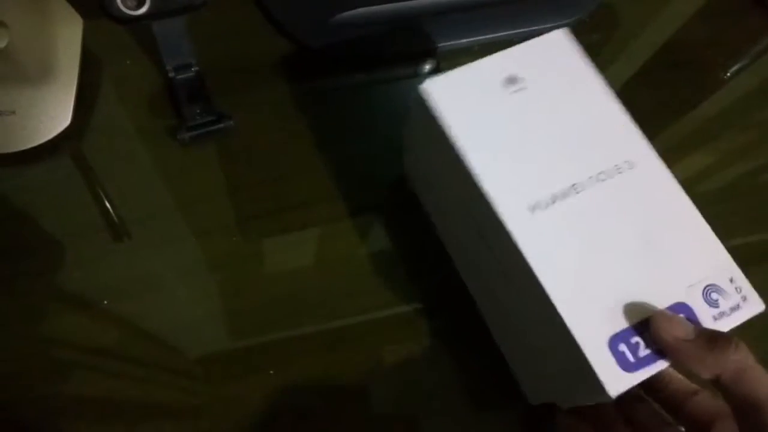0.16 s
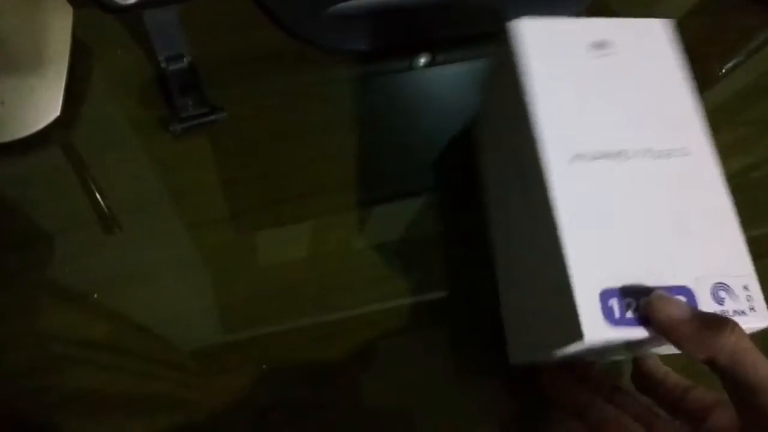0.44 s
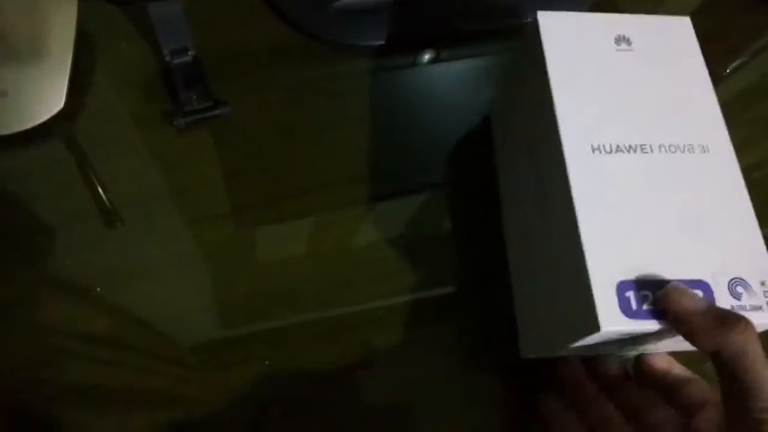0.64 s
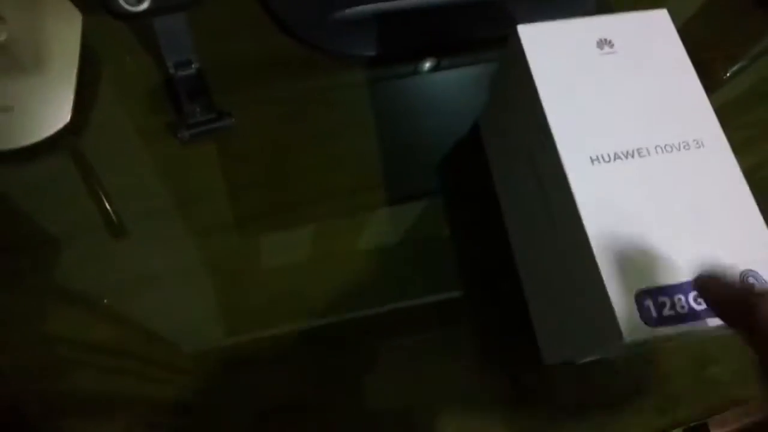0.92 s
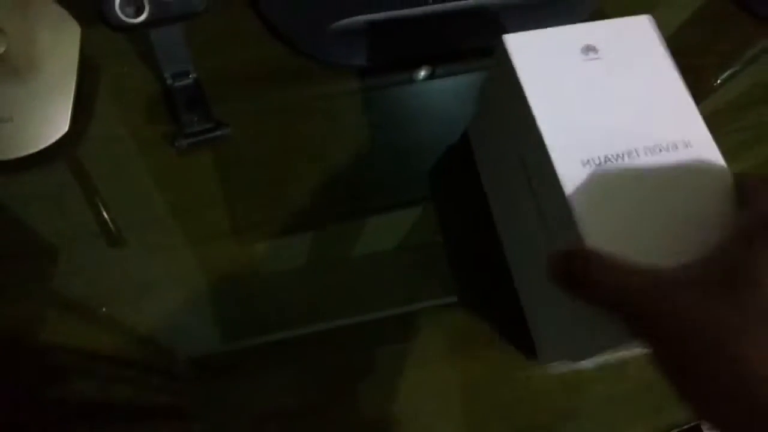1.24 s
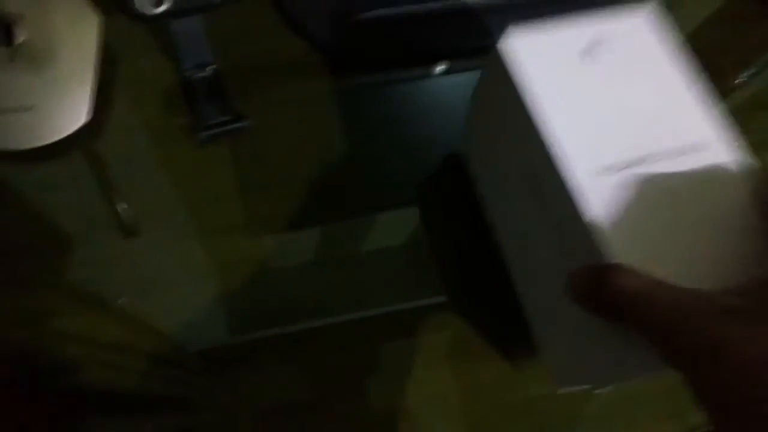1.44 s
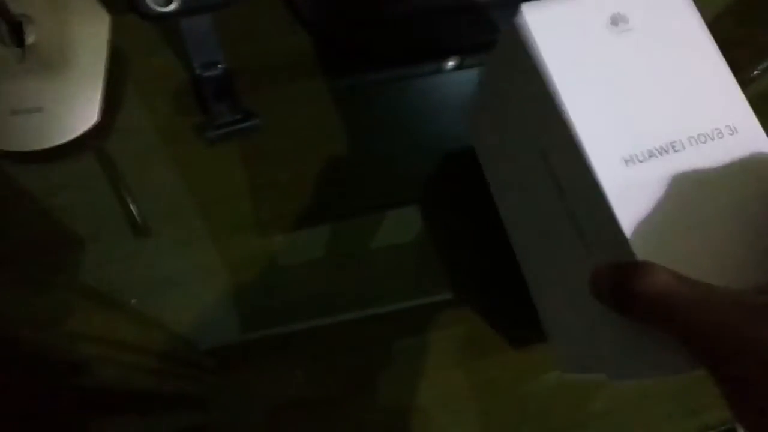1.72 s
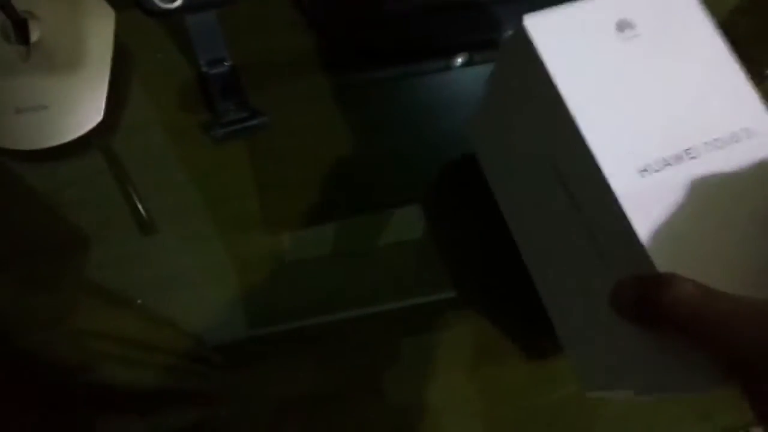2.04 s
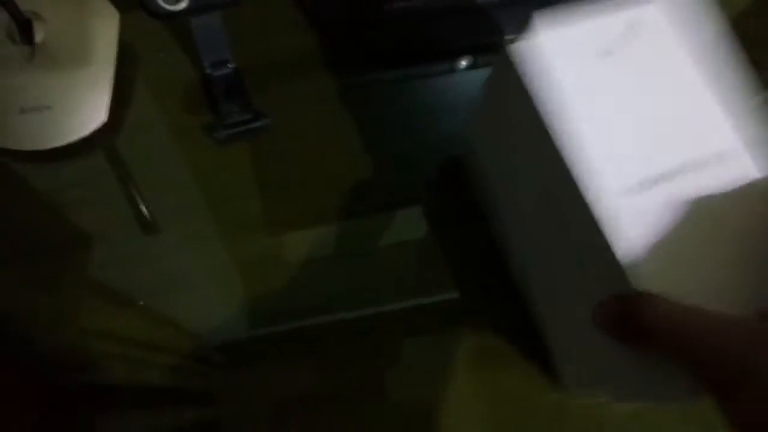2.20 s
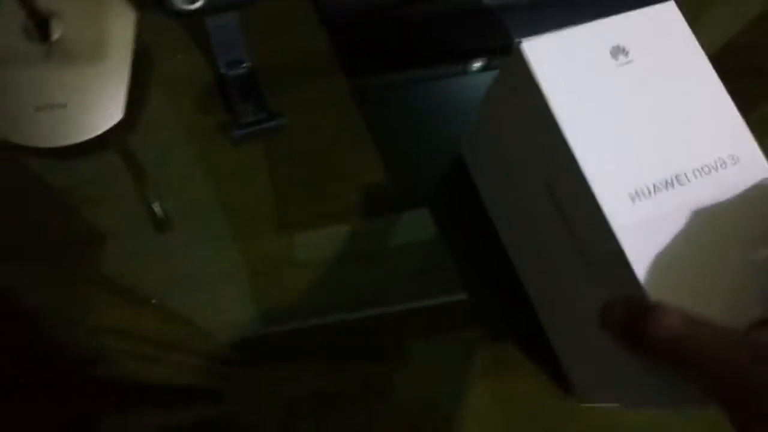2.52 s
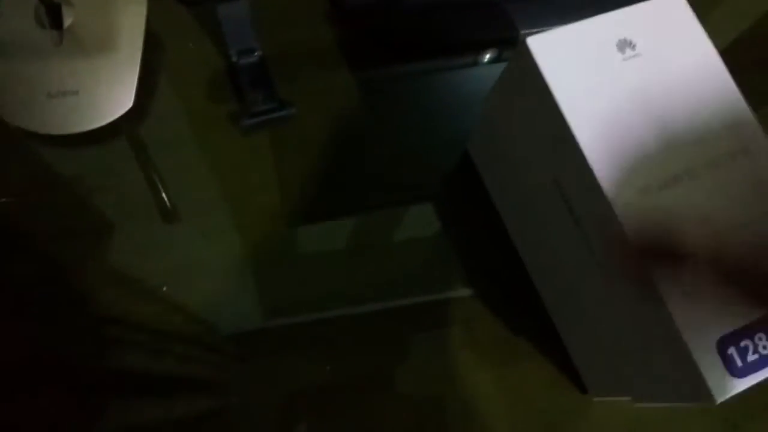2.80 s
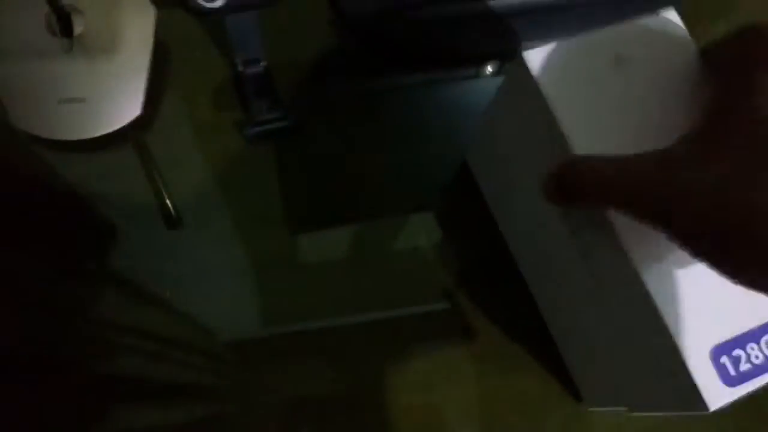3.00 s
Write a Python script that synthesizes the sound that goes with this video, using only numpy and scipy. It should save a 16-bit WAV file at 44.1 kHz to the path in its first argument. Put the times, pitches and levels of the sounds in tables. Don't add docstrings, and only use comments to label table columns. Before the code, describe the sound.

A cardboard box is handled in a small room: faint rubbing and a few ticks, a soft table thud, then hollow knocks growing into loud rattling bursts; close microphone, left channel only, low hum behind.

```python
import sys
import numpy as np
from scipy import signal
from scipy.fft import rfft, irfft
from scipy.io import wavfile
from scipy.ndimage import uniform_filter1d

SR = 44100
rng = np.random.default_rng(int(sys.argv[2]) if len(sys.argv) > 2 else 0)


def to_wav(sig):
    pcm = np.clip(np.atleast_2d(sig), -1, 1) * 32767
    pcm = np.round(pcm).astype(np.int16)
    wavfile.write(sys.argv[1], SR, pcm.T)


def boost(x):
    u = np.asarray(x, float) / 20
    return 10 ** u


N = 138915

# pitch_hz, level_db (per Hz)
HISS_SPECTRUM = [(30, -103), (60, -87.5), (110, -89), (400, -94.5), (1500, -103), (5800, -109),
                 (8000, -120), (16000, -124)]
# pitch_hz, width_hz, level_db
HUM_BANDS = [(112.8, 27, -61), (60.4, 48, -63), (145, 24, -68)]
# time_s, level_db
DRONE_LEVELS = [(0.0, -64), (0.06, -58.5), (0.48, -81), (0.66, -60), (1.01, -60.5), (1.17, -79),
                (1.26, -60), (1.92, -55.5), (2.05, -48.5), (2.38, -60), (2.44, -54), (2.79, -74),
                (3.01, -55), (3.15, -64.5)]
# peak_s, half_length_s, level_db, hollow_db, strongest_card_hz
RUBS = [(2.757, 0.032, -51, -22, 4250), (2.779, 0.031, -61.5, -5, 5660), (0.06, 0.11, -63, 5, 5350),
        (0.152, 0.0095, -47, -1.5, 3300), (0.401, 0.0086, -35.5, -37, 5280),
        (0.399, 0.032, -46.5, -16.5, 2030), (0.407, 0.017, -53, -13, 1080),
        (0.528, 0.076, -53.5, -12, 3000), (0.586, 0.031, -46.5, -6.5, 3800), (0.651, 0.023, -45, -8, 3470),
        (0.74, 0.063, -55, 5, 3430), (0.782, 0.0093, -28.5, -5, 3300), (0.828, 0.013, -38.5, -7, 1700),
        (0.982, 0.017, -42, -5, 3430), (1.284, 0.019, -52, -5.5, 1990), (1.365, 0.032, -47.5, -4, 4710),
        (1.497, 0.028, -50, 5.5, 5900), (1.686, 0.14, -62.5, 11, 1700), (1.74, 0.022, -41, 5, 5230),
        (1.88, 0.069, -55, 7.5, 6250), (2.042, 0.025, -43, 6, 2490), (2.146, 0.02, -42.5, 1, 2500),
        (2.192, .04, -56.5, 11.5, 2300), (2.367, 0.038, -34.5, 7.5, 3860),
        (2.675, 0.017, -47.5, 10.5, 1100)]
# pitch_hz, width_hz, level_db
CARD_RESONANCES = [(1100, 58, -0.5), (1873, 440, 1), (3102, 300, -1), (3430, 340, -2), (4250, 2300, -9.5),
                   (5600, 720, 0), (7680, 2200, -19), (2300, 5200, 1.5), (11400, 10000, -1)]
# pitch_hz, width_hz, level_db
HOLLOW_RESONANCES = [(330, 260, 5.5), (485, 800, 1.5), (950, 680, 3), (1700, 1400, -14.5)]
# start_s, level_db, centre_hz, length_s
TICKS = [(0.097, -47, 3120, 0.021), (0.098, -53, 5600, 0.014), (0.131, -34, 2040, 0.0093),
         (0.786, -18, 1210, 0.0063), (.792, -23, 5400, 0.0047), (1.466, -49, 3250, 0.011),
         (1.49, -32.5, 4800, 0.006), (1.721, -18, 1700, 0.0026), (1.735, -34, 2500, 0.0045),
         (1.760, -31, 2500, 0.0033), (2.076, -20.5, 2800, 0.0023), (0.14, -38.5, 3200, 0.0017),
         (0.68, -45, 2000, 0.0033), (1.738, -42, 5500, 0.0027), (1.739, -30, 3030, 0.018),
         (1.753, -35.5, 5700, 0.0056), (2.02, -33, 2550, 0.0012), (2.035, -28, 2480, 0.0034),
         (2.041, -29.5, 5600, 0.002), (2.059, -17.5, 1500, 0.0036), (2.087, -30.5, 3260, 0.0028),
         (2.104, -15, 5300, 0.0014), (2.1046, -14.5, 2030, 0.0027), (2.1145, -20, 3310, 0.0026),
         (2.115, -20, 1700, 0.0061), (2.126, -21, 3000, .004), (2.138, -16, 1670, 0.005),
         (2.324, -22, 3420, 0.0013), (2.335, -31.5, 4000, 0.011), (2.346, -29.5, 4000, 0.013),
         (2.348, -50, 4840, 0.02), (2.395, -6, 1300, 0.0043), (2.396, -17.5, 2400, 0.0027),
         (2.355, -24, 5500, 0.0046), (2.526, -32, 3000, 0.0045), (2.672, -43, 4300, 0.0031),
         (2.693, -51, 4870, 0.017)]
# pitch_hz, level_db, t60_s
TABLE_MODES = [(179.4, -5, 0.071), (321, 9, 0.054), (323, -13, 0.14), (432.5, -4, 0.089), (638, -9, 0.047),
               (860, -11.5, 0.05)]
# start_s, level_db, wall_pitch_hz, upper_modes_db
KNOCKS = [(.988, -29.5, 397, -19), (1.281, -31.5, 240, -5.5), (1.309, -35.5, 950, -23),
          (1.45, -26, 373, -25), (1.470, -6.5, 615, -6.5), (1.492, -9, 934, -0.5), (1.676, -27, 405, -29),
          (1.719, -23.5, 435, -0.5), (1.742, -11.5, 1040, -2.5), (1.760, -26, 700, 0.5),
          (1.78, -20, 950, -1), (1.811, -15, 480, -1), (1.971, -43, 402, 7), (1.998, -15, 390, -15.5),
          (2.02, -14.5, 380, -18), (2.065, -18.5, 388, -11), (2.077, 4, 421, -6.5),
          (2.088, -7.5, 510, -4.5), (2.126, -7, 504, -1.5), (2.272, -28.5, 350, -12.5),
          (2.314, -15.5, 330, -11), (2.323, 0, 806, 0), (2.336, -0.5, 284, -7), (2.345, -1, 435, -2.5),
          (2.357, -9, 486, -22), (2.399, -7.5, 500, -9), (2.41, -9, 487, -17), (1.711, -28, 384, -18.5),
          (1.745, -18.5, 514, -7.5), (1.874, -33, 910, -5), (2.031, -25, 413, -12),
          (2.044, -24.5, 610, -2.5), (2.105, -20.5, 700, 3.5), (2.116, -18, 520, 0.5),
          (2.143, -21, 480, -0.5), (2.329, -14, 700, -8), (2.391, -17, 450, -1), (2.430, -19.5, 427, -9),
          (1.504, -24, 990, -9), (2.666, -15.5, 840, -5), (2.524, -19.5, 1050, 4), (2.659, -17.5, 950, 8)]
# pitch_hz, level_db, t60_s
BOX_MODES = [(329, 3.5, 0.03), (458, 4, 0.025), (684, 7, 0.01), (826, 3.5, 0.015), (1165, 0.5, 0.025),
             (1500, -1, 0.009), (2090, 1, 0.0045), (3300, -12, 0.017)]
# pitch_hz, level_db, t60_s
ROOM_BANDS = [(130, -18.5, 0.54), (300, -11.5, 0.31), (700, -11.5, 0.12), (1500, -13.5, 0.27),
              (3000, -19.5, 0.36), (6000, -33, .25), (12000, -33, 0.38)]
# pitch_hz, level_db, t60_s
STANDING_WAVES = [(109.9, -42, 0.66), (172.2, -52, 0.26), (246.6, -55.5, 0.17), (281.1, -53, .2),
                  (318.1, -46, 0.19), (464.6, -57.5, 0.11), (551.7, -58.5, .15)]

LIVE_HISS_DB = 1.5
SHAKE_S, SHAKE_WIDTH_S, SHAKE_DB, HUM_WALK_DB = 2.23, 0.48, 15, 1.2
DRONE_HZ, DRONE_WOBBLE_HZ = 72.1, 1.4
GRIT_DB, GRIT_SHARE = 4, 0.11
FOCUS_DB, FALL_RATIO = 11, 1.453
CARD_DRIFT, CARD_FLICKER_DB = 0.04, 2.5
OWN_DB, OWN_WIDTH = -15, 0.058
TICK_WIDTH, TICK_RISE = 0.7, 0.12
SET_DOWN_S, SET_DOWN_DB, SET_DOWN_PUSH_S, SET_DOWN_ROOM_DB = 0.786, -12.5, 0.0071, -10
BOX_LOW_HZ, TABLE_LOW_HZ = 214, 140
WALL_CYCLES, CONTACT_CYCLES = 9, 0.42
SAG, SAG_CYCLES = 0.15, 0.86
SCATTER_DB, UNDER_DB_PER_OCT = 2, 1.5
CLATTER_DB, CLATTER_S = -16, 0.012
REBOUND_S, REBOUND_DB = 0.0035, -15
ROOM_DELAY_S = 0.0059
MIC_KNEE_HZ, MIC_TOP_DB, TOP_HZ = 6100, -6, 15600


def band(x, hz, width):
    return signal.lfilter(*signal.iirpeak(min(hz, 0.45 * SR), hz / width, fs=SR), x)


def unit(x):
    return x / np.sqrt(np.mean(x ** 2))


def steep(x, hz, width):
    once = band(x, hz, width * 1.04)
    return unit(band(once, hz, width * 1.04))


def above(x, hz):
    return signal.sosfilt(signal.butter(4, hz, "high", fs=SR, output="sos"), x)


def ring(hz, t60, size=8192):
    t = np.arange(size) / SR
    return np.sin(2 * np.pi * hz * t) * np.exp(-np.log(1000) * t / max(t60, 1e-3))


def soft_contact(t, push_s):
    return np.sin(np.pi / 2 * np.minimum(t / push_s, 1)) ** 2


def add(out, x, at_s):
    i = int(at_s * SR)
    out[i:i + len(x)] += x[:N - i]


def walk(rate):
    k = int(SR / rate)
    steps = np.repeat(rng.standard_normal(N // k + 1), k)
    smooth = uniform_filter1d(uniform_filter1d(steps, k), k)
    return unit(smooth[:N])


def drift(x, share):
    samples = np.arange(N)
    return np.interp(samples + share * SR / 40 * walk(7), samples, x)


def hiss():
    hz = np.maximum(np.fft.rfftfreq(N, 1 / SR), 1)
    table_hz, table_db = np.array(HISS_SPECTRUM).T
    db = np.interp(np.log(hz), np.log(table_hz), table_db)
    noise = rfft(rng.standard_normal((2, N)))
    input_gain = boost(np.array([[LIVE_HISS_DB], [0]]))
    return irfft(noise * boost(db) * np.sqrt(SR / 2), N) * input_gain


def hum():
    t = np.arange(N) / SR
    swell = SHAKE_DB * np.exp(-((t - SHAKE_S) / SHAKE_WIDTH_S) ** 2)
    out = np.zeros(N)
    for hz, width, db in HUM_BANDS:
        level = boost(db + swell + HUM_WALK_DB * walk(2.56))
        noise = band(rng.standard_normal(N), hz, width)
        out += level * unit(band(noise, hz, width))
    return out


def drone():
    times, levels = np.array(DRONE_LEVELS).T
    db = 5.5 + np.interp(np.arange(N) / SR, times, levels)
    phase = 2 * np.pi * np.cumsum(DRONE_HZ + DRONE_WOBBLE_HZ * walk(12)) / SR
    return np.sqrt(2) * boost(db) * np.sin(phase)


def rubs():
    t = np.arange(N) / SR
    grit = rng.standard_normal(N)
    catches = rng.random(N) < GRIT_SHARE
    grit *= 1 + catches * boost(GRIT_DB * np.minimum(rng.exponential(size=N), 3))
    grit *= boost(2.3 * walk(120))
    card = []
    for hz, width, db in CARD_RESONANCES:
        flicker = boost(db + CARD_FLICKER_DB * walk(25.05))
        card.append(flicker * drift(steep(grit, hz, width), CARD_DRIFT))
    hollow = unit(sum(boost(db) * steep(grit, hz, width) for hz, width, db in HOLLOW_RESONANCES))

    out = np.zeros(N)
    for peak_s, half_s, db, hollow_db, focus_hz in RUBS:
        distance = np.where(t < peak_s, (peak_s - t) / half_s, (t - peak_s) / half_s / FALL_RATIO)
        shape = np.exp(-distance ** 1.65)
        colour = boost(OWN_DB) * steep(grit, focus_hz, OWN_WIDTH * focus_hz)
        for (hz, _, _), sound in zip(CARD_RESONANCES, card):
            nearness = np.exp(-(np.log(hz / focus_hz) / 0.12) ** 2)
            colour += boost(FOCUS_DB * (nearness - 1.5)) * sound
        out += boost(db) * shape * (colour + boost(hollow_db) * hollow)
    return out


def ticks():
    out, t = np.zeros(N), np.arange(2048) / SR
    for start_s, db, hz, length in TICKS:
        rise = np.minimum(t / length / TICK_RISE, 1)
        burst = rng.standard_normal(len(t)) * np.exp(-t / length * 2) * rise
        core = band(band(burst, hz, TICK_WIDTH * hz), hz, TICK_WIDTH * hz)
        skirt = boost(-14) * band(burst, 3100, 3100) + boost(-26.5) * burst
        add(out, boost(db) * above(4 * core + skirt, 320), start_s)
    return out


def set_down():
    size = 16384
    contact = soft_contact(np.arange(size) / SR, SET_DOWN_PUSH_S)
    table = sum(boost(db) * ring(hz, t60, size) for hz, db, t60 in TABLE_MODES)
    out = np.zeros(N)
    add(out, contact * table, SET_DOWN_S)
    return boost(SET_DOWN_DB) * above(out, TABLE_LOW_HZ)


def gripped_wall(t, hz):
    sag_s = SAG * SAG_CYCLES / hz * (1 - np.exp(-t * hz / SAG_CYCLES))
    return np.interp(t + sag_s, t, ring(hz, WALL_CYCLES / hz))


def upper_box(t, wall_hz, chance):
    out = np.zeros(len(t))
    for (hz, db, t60), sign, scatter, detune in zip(BOX_MODES, *chance):
        under_db = UNDER_DB_PER_OCT * min(np.log2(hz / wall_hz), 0)
        gain = np.sign(sign) * boost(db + SCATTER_DB * scatter + under_db)
        out += gain * ring(hz * (1 + 0.078 * detune), t60)
    clatter = unit(band(rng.standard_normal(len(t)), 870, 1300))
    return out + boost(CLATTER_DB) * clatter * np.exp(-t / CLATTER_S)


def knocks():
    out, t = np.zeros(N), np.arange(8192) / SR
    for start_s, db, hz, upper_db in KNOCKS:
        chance = rng.standard_normal((3, len(BOX_MODES)))
        upper = upper_box(t, hz, chance)
        contact = soft_contact(t, CONTACT_CYCLES / hz)
        blow = gripped_wall(t, hz) + boost(upper_db - 9) * upper
        add(out, -boost(db) * contact * blow, start_s)
        rebound = boost(db + upper_db + REBOUND_DB) * contact * upper
        add(out, rebound, start_s + REBOUND_S * (1 + chance.mean()))
    return above(out, BOX_LOW_HZ)


def room(x):
    t = np.arange(SR // 2) / SR
    tail = np.zeros(len(t))
    for hz, db, t60 in ROOM_BANDS:
        noise = unit(band(rng.standard_normal(len(t)), hz, 1.8 * hz))
        tail += boost(db - 36) * noise * np.sqrt(hz / 1000) * np.exp(-np.log(1000) * t / t60)
    for hz, db, t60 in STANDING_WAVES:
        tail += boost(db) * ring(hz, t60, len(t))
    gap = np.clip(t / ROOM_DELAY_S - 1, 0, 1)
    return signal.fftconvolve(x, tail * gap)[:N]


def capsule(x):
    hz = np.fft.rfftfreq(N, 1 / SR)
    step_db = MIC_TOP_DB / (1 + np.exp((MIC_KNEE_HZ - hz) / 500))
    return irfft(rfft(x) * boost(step_db), N)


def scene():
    near = knocks() + ticks() + rubs()
    thud = set_down()
    echo = room(near + boost(SET_DOWN_ROOM_DB) * thud)
    left = capsule(near + thud + echo) + hum() + drone()
    return np.array([left, np.zeros(N)]) + hiss()


def top_cut(x):
    return signal.sosfilt(signal.butter(12, 16610, fs=SR, output="sos"), x)


def record(dry):
    clipped = np.clip(dry, -1, 1)
    low_pass = signal.ellip(8, 0.2, 60, TOP_HZ, fs=SR, output="sos")
    return top_cut(signal.sosfilt(low_pass, clipped))


dry = scene()
out = record(dry)
to_wav(out)
```